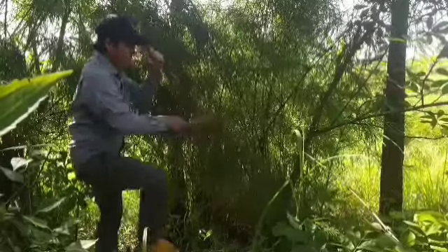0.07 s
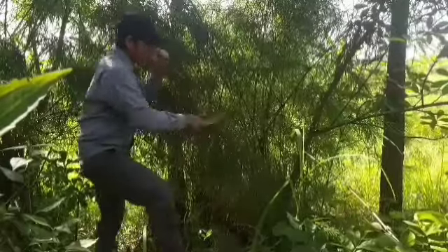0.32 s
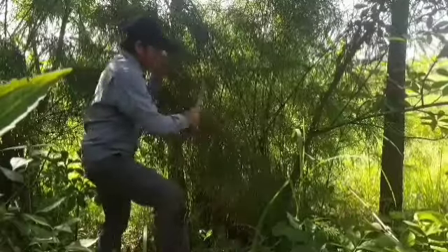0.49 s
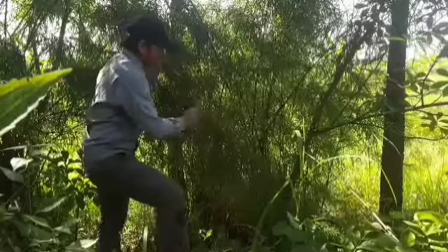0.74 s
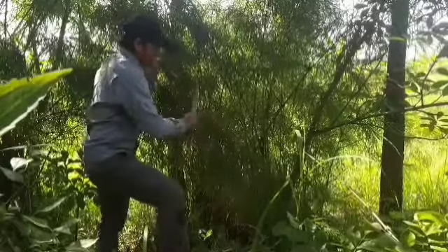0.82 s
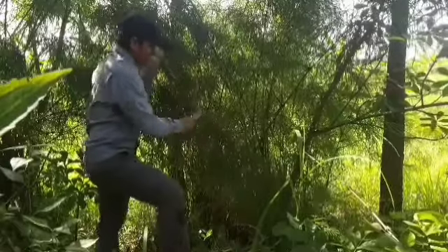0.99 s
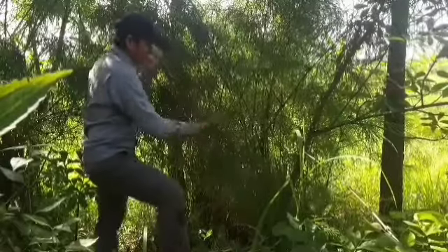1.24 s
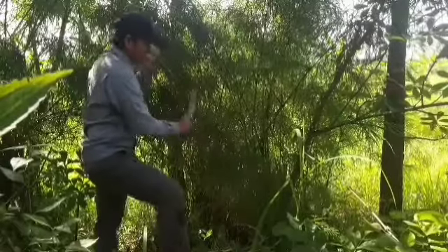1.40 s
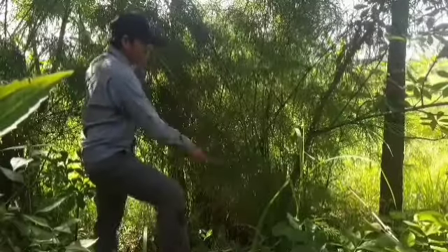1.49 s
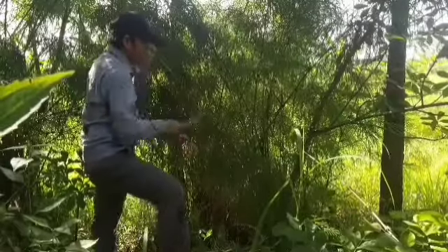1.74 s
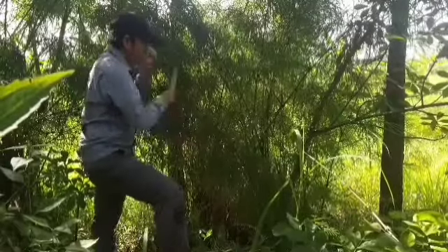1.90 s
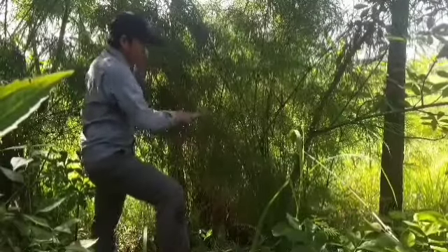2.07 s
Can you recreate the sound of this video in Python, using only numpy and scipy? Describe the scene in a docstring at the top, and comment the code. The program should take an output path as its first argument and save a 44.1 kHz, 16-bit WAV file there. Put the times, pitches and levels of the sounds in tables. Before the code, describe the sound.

A machete hacks thin woody stems in a thicket: three quick cracking strokes, a short gap, then three more, with bright blade ring and leaf rustle. Outdoors, mono, moderately close, soft forest echo and thin hiss.

```python
"""A long blade hacks at thin woody stems in a forest thicket: six strokes in 2.2 s.
A faint rustle comes first. Each stroke is a cluster of contacts: bursts of fibre snaps excite stem, blade and
splinter filters, while shaken leaves rustle as enveloped noise. Dull noise thuds lie under strokes 2, 3, 5 and 6;
the blade sings on after stroke 4 as a fuzzy sine. Decaying noise tails give the forest echo; a high hiss and
a low rumble, both filtered noise, run throughout."""
import sys
import numpy as np
from scipy import signal
from scipy.fft import rfft, irfft, next_fast_len
from scipy.io import wavfile
from scipy.ndimage import map_coordinates

SR = 44100
rng = np.random.default_rng(int(sys.argv[2]) if len(sys.argv) > 2 else 0)


def materialize(psi):
    """Save the field psi as 16-bit PCM at rate SR to the path in sys.argv[1].

    A 1-D psi becomes a single channel; in a 2-D psi each row is a channel.
    """
    bounded = np.clip(np.atleast_2d(psi).T, -1, 1)
    quanta = np.round(bounded * 32767).astype(np.int16)
    wavfile.write(sys.argv[1], SR, quanta)


N = 97020

# blade meets stem: (start [s], rise [s], decay [s], wood level [dB], blade ring level [dB], splinter level [dB],
# blade side modes [dB added], stem resonance [Hz], lowest wood frequency [Hz])
CONTACTS = [ (0.1721, 0.00035, 0.0039, -45.5, -43.5, -56, -11, 797, 447),
            (0.2040, 0.00058, 0.0032, -55, -54, -42, 2, 2290, 1100),
            (0.2083, .002, 0.0017, -42, -32.5, -46, -3.5, 2150, 1170),
            (0.319, 0.00045, 0.0055, -65, -77, -83, -2, 2100, 1000),
            (0.342, 0.0012, 0.0078, -65, -66, -71, 0, 3570, 1400),
            (0.4115, 0.00039, 0.0024, -47.5, -35, -35, 26, 2400, 1300),
            (0.4262, 0.0013, 0.0027, -50, -45, -56, -11, 2300, 1200),
            (0.4500, 0.0059, 0.0068, -30, -39, -39, 7, 1280, 1030),
            (0.4618, 0.0019, 0.009, -33, -33.5, -33, 4, 3670, 255),
            (0.4656, .0004, 0.00095, -35, -26.5, -36, 8, 4500, 295),
            (0.5055, 0.0017, 0.0024, -54.5, -67, -64, -8, 4700, 990),
            (0.7040, 0.00023, 0.0019, -51.5, -39, -58, -6.5, 4440, 1770),
            (0.7101, 0.00019, .003, -47.5, -49, -46.5, 0, 2180, 1360),
            (0.7366, 0.0012, 0.0055, -44, -32.5, -44, 0, 3770, 503),
            (0.7405, 0.00043, 0.00029, -36.5, -23.5, -30.5, 0.5, 1086, 298),
            (0.7420, 0.00035, 0.004, -35.5, -32, -50, -2, 1270, 250),
            (0.7610, 0.0004, .0015, -46.5, -55, -37.5, 11, 1500, 200),
            (0.8380, .001, 0.009, -57.5, -64, -62, -4, 4500, 800),
            (1.2248, 0.00026, 0.0036, -46.5, -36, -72, -16, 1820, 1330),
            (1.268, 0.0061, 0.0058, -46, -47, -43.5, 1, 2160, 1350),
            (1.317, 0.0013, 0.0055, -41.5, -35.5, -42, 8.5, 5180, 880),
            (1.4800, 0.00018, 0.00049, -43.5, -29, -42, 2.5, 2320, 600),
            (1.5328, 0.00098, 0.0049, -46.5, -41, -43, 9, 2820, 664),
            (1.5468, 0.00094, 0.009, -49.5, -49, -60, -12, 2180, 900),
            (1.5745, 0.0031, 0.0041, -45.5, -45, -62, -2, 2150, 717),
            (1.6440, 0.0047, 0.0058, -62, -46, -54, 13, 4900, 1500),
            (1.7040, 0.00026, 0.0013, -78, -63, -55.5, 12, 6140, 2000),
            (1.8573, 0.00023, 0.0047, -44.5, -33, -43, -7.5, 4570, 874),
            (1.879, 0.0009, 0.0064, -43.5, -36.5, -42, 3, 6240, 1100),
            (1.9020, 0.00017, 0.0028, -44.5, -49, -52, -3, 2210, 1300),
            (1.9197, .0005, 0.0037, -37, -30, -53, 2, 2930, 614),
            (1.9230, 0.0032, 0.0071, -44, -58, -41, -6, 870, 200),
            (1.9444, 0.0014, 0.0016, -48, -64, -43, 3, 2280, 404),
            (1.9900, 0.00066, .002, -68, -53.5, -52.5, 4, 4800, 1000), ]
# blade modes, main one first: (frequency [Hz], width [Hz], gain [dB])
BLADE_MODES = [(7980, 153, 3), (4850, 58, -11.5), (6224, 99, -11.5), (8340, 420, -8.5), (8680, 410, -8.5),
               (9730, 274, -6.5), (11770, 440, -24.5), (11870, 75, -11)]
# wood filter, for stems and twigs: (frequency [Hz], gain [dB])
WOOD_COLOUR = [(100, -28), (300, -8), (600, -7.5), (850, -4), (1050, -7), (1350, -1), (1800, -2),
               (2200, -0.5), (2550, -1), (3000, -0.5), (3700, -1.5), (4500, 1), (5400, -3.5), (6200, 2.5),
               (7100, -11), (10000, -30.5), (16000, -15.5)]
# splinter filter: (frequency [Hz], gain [dB])
SPLINTER_COLOUR = [(500, -51), (5000, -9.5), (7300, -21.5), (8100, 6.5), (9800, -4), (10600, 2.5),
                   (12500, 4.5), (14000, 2.5), (15000, 2), (16000, -36)]
# blade singing on after sliding off a stem: (start [s], frequency [Hz], level [dB], t60 [s])
BLADE_ZINGS = [(1.320, 10010, -40, .13)]
# clump shuddering under heavier blows: (start [s], rise [s], decay [s], level [dB])
CLUMP_THUDS = [(0.451, 0.025, 0.016, -54), (0.738, .012, 0.023, -58.5), (1.570, 0.014, 0.034, -62),
               (1.916, 0.03, 0.053, -61)]
# thud filter: (frequency [Hz], gain [dB])
THUD_COLOUR = [(60, -25), (110, -6), (160, 0.5), (250, 1.5), (340, -6.5), (480, -15), (900, -28),
               (3000, -58)]
# shaken foliage: (peak time [s], rise [s], decay [s], leaf drive [dB], twig drive [dB])
FOLIAGE_SHAKES = [ (0.010, 0.03, 0.038, -66, -70.5), (0.215, 0.025, 0.051, -49, -52.5),
                  (0.423, 0.0062, .04, -46.5, -45.5), (0.47, 0.0063, .022, -36, -46.5),
                  (0.722, 0.0081, 0.027, -50.5, -49), (0.749, .006, 0.026, -38, -43.5),
                  (1.105, 0.017, 0.031, -59.5, -91), (1.241, 0.0053, 0.011, -56, -54.5),
                  (1.293, 0.022, 0.038, -52.5, -53.5), (1.327, 0.0068, 0.028, -52, -58.5),
                  (1.49, 0.0067, 0.025, -69, -49), (1.606, 0.03, 0.021, -45.5, -48),
                  (1.938, 0.025, 0.017, -41, -42), (2.190, 0.034, 0.034, -72, -75), ]
# leaf filter: (frequency [Hz], gain [dB])
LEAF_COLOUR = [(300, -53), (2000, -12.5), (5000, -8), (7200, -7.5), (8050, 10.5), (9000, 2), (9900, 9),
               (10600, 3.5), (12500, 4.5), (15000, -0.5), (16000, 2)]
# forest echo decay: (frequency [Hz], t60 [s])
ECHO_T60 = [(200, .35), (1000, 0.37), (4000, 0.38), (9000, 0.42), (16000, 0.53)]
# forest echo filter: (frequency [Hz], gain [dB])
ECHO_COLOUR = [(200, -1), (1500, -18), (5000, -15.5), (8000, -14.5), (11000, -13.5), (16000, -11)]
# hiss filter: (frequency [Hz], gain [dB])
HISS_COLOUR = [(300, -11.5), (1000, -22), (2000, -24.5), (3800, -28), (5200, -17), (7100, -16.5),
               (8100, -4.5), (8650, 2), (9500, -10), (11500, -8.5), (13000, -15), (15500, -12)]
# hiss course: (time [s], level [dB])
HISS_LEVEL = [(0, -62.5), (.14, -63), (.3, -58), (.39, -67.5), (.6, -65.5), (.68, -67), (.9, -60),
              (.98, -67), (1.03, -61), (1.2, -64), (1.45, -66), (1.68, -60.5), (1.83, -66.5), (1.95, -56.5),
              (2.07, -64.5), (2.2, -61.5)]
# rumble filter: (frequency [Hz], gain [dB])
RUMBLE_COLOUR = [(20, -43), (38, -23), (54, 1), (75, -7), (98, -11), (122, -6.5), (160, -14), (210, -22),
                 (290, -21), (400, -40.5), (600, -55.5), (1500, -51.5)]
# rumble course: (time [s], level [dB])
RUMBLE_LEVEL = [(0.0, -58.5), (0.04, -57), (0.41, -56.5), (0.43, -55), (0.6, -55), (0.64, -72), (0.77, -52),
                (0.9, -50), (0.96, -64.5), (0.99, -59.5), (1.19, -55), (1.28, -60), (1.32, -53),
                (1.38, -59), (1.89, -60), (1.95, -57), (2.08, -60), (2.2, -55)]

LEVEL_WINDOW_S = 0.004  # contact levels: rms as if all energy fell in this window
SNAPS_PER_S, SNAP_SPREAD_DB = 16000, 0.5
STRIKE_DB = 13  # sharp strike at the peak of the burst, re rms of the snaps before their envelope
STEM_Q, STEM_RING_DB = 12.2, 7.5
BEND_RATIO, BEND_DB = 2.7, -1.5  # second bending mode of the stem
ECHO_RISE_S = 0.0036
TOP_HZ = 15500


def cracks():
    """Each contact: a burst of fibre snaps with a strike at its peak, sounding in stem, blade and splinters."""
    out = np.zeros(N + SR)
    t = np.arange(SR // 10) / SR
    window_gain = np.sqrt(LEVEL_WINDOW_S * SR / len(t))
    for start_s, rise_s, decay_s, wood_db, ring_db, splinter_db, side_db, own_hz, lowest_hz in CONTACTS:
        envelope = np.minimum(t / rise_s, 1) * np.exp(-np.maximum(t - rise_s, 0) / decay_s)
        fibres = envelope * snaps(len(t), SNAPS_PER_S, SNAP_SPREAD_DB)
        fibres[round(rise_s * SR)] += amp(STRIKE_DB)
        wood = filtered(coloured(fibres, WOOD_COLOUR), lambda hz: stem(hz, own_hz, lowest_hz))
        ring = filtered(fibres, lambda hz: blade(hz, side_db))
        splinters = coloured(fibres, SPLINTER_COLOUR)
        crack = amp(wood_db) * unit(wood)
        crack += amp(ring_db) * unit(ring)
        crack += amp(splinter_db) * unit(splinters)
        out[round(start_s * SR):][:len(t)] += crack * window_gain
    return out[:N]


def stem(hz, own_hz, lowest_hz):
    """Stem response: two bending modes; the thinner the stem, the less bass it radiates."""
    u = 1j * hz / lowest_hz
    high_pass = u ** 3 / ((1 + u) * (1 + u + u * u))  # third order
    modes = [(own_hz, STEM_RING_DB), (own_hz * BEND_RATIO, BEND_DB)]
    ringing = sum(amp(db) * resonance(hz, centre_hz, centre_hz / STEM_Q) for centre_hz, db in modes)
    return high_pass * (1 + ringing)


def blade(hz, side_db):
    """Blade response: the point of impact sets how strongly the side modes join the main one."""
    response = 0
    for k, (centre_hz, width_hz, db) in enumerate(BLADE_MODES):
        mode_db = db + side_db * (k > 0)
        response = response + (-1) ** k * amp(mode_db) * resonance(hz, centre_hz, width_hz)
    return response


def resonance(hz, centre_hz, width_hz):
    """Response of one damped mode."""
    return 1j * hz * width_hz / (centre_hz ** 2 - hz ** 2 + 1j * hz * width_hz)


def snaps(size, per_s, spread_db):
    """Tiny fibre or leaf snaps: random moments, signs and strengths, rms 1."""
    fires = rng.random(size) < per_s / SR
    strength = amp(spread_db * np.clip(rng.standard_normal(size), -2, 2))
    sign = np.sign(rng.standard_normal(size))
    return unit(fires * strength * sign)


def zings(knots_per_s=160, rise_s=0.002):
    """The freed blade holds one high decaying tone; random phase makes it slightly fuzzy."""
    out = np.zeros(N + SR)
    t = np.arange(N) / SR
    for start_s, hz, db, t60_s in BLADE_ZINGS:
        envelope = amp(db - 60 * t / t60_s) * np.minimum(t / rise_s, 1)
        tone = envelope * np.sin(2 * np.pi * hz * t + wobble(knots_per_s))
        out[round(start_s * SR):][:SR // 2] += tone[:SR // 2]
    return out[:N]


def thuds():
    """The clump of stems shudders: low noise with a soft onset and exponential decay."""
    t = np.arange(N) / SR
    shudder = np.zeros(N)
    for start_s, rise_s, decay_s, db in CLUMP_THUDS:
        rise = np.clip((t - start_s) / rise_s, 0, 1)
        decay = np.exp(-np.maximum(t - start_s - rise_s, 0) / decay_s)
        shudder += amp(db) * rise * decay
    return shudder * unit(coloured(rng.standard_normal(N), THUD_COLOUR))


def foliage():
    """Leaves and twigs brush each other as the stem jerks, then settle."""
    t = np.arange(N) / SR
    leaves, twigs = np.zeros(N), np.zeros(N)
    for peak_s, rise_s, decay_s, leaves_db, twigs_db in FOLIAGE_SHAKES:
        shake = np.exp(-np.maximum((peak_s - t) / rise_s, (t - peak_s) / decay_s))
        leaves += amp(leaves_db) * shake
        twigs += amp(twigs_db) * shake
    brushing = snaps(N, per_s=12000, spread_db=3)
    crackling = snaps(N, per_s=6000, spread_db=5)
    return coloured(leaves * brushing, LEAF_COLOUR) + coloured(twigs * crackling, WOOD_COLOUR)


def forest(x):
    """Trunks and crowns scatter a diffuse tail, redrawn for every quarter second of sound."""
    out = np.zeros(N + 2 * SR)
    step = SR // 4
    for start in range(0, N, step):
        hz, t, bins = signal.stft(rng.standard_normal(SR // 2), SR, nperseg=256)
        fade = amp(-60 * t / along(ECHO_T60, hz)[:, None])
        rise = 1 - np.exp(-t / ECHO_RISE_S)
        tail = signal.istft(bins * fade * rise, SR)[1]
        echo = signal.fftconvolve(x[start:start + step], tail / np.linalg.norm(tail))
        out[start:][:len(echo)] += echo
    return coloured(out[:N], ECHO_COLOUR)


def background(flutter_db=0.54):
    """A thin fluttering hiss, like far insects, over an uneven low rumble; both shaped noise."""
    hiss = unit(coloured(rng.standard_normal(N), HISS_COLOUR))
    rumble = unit(coloured(rng.standard_normal(N), RUMBLE_COLOUR))
    hiss_db = curve(HISS_LEVEL) + flutter_db * wobble(45)
    return hiss * amp(hiss_db) + rumble * amp(curve(RUMBLE_LEVEL))


def wobble(knots_per_s):
    """Smooth random curve from normal-distributed knots."""
    knots = rng.standard_normal(int(N * knots_per_s / SR) + 4)
    return map_coordinates(knots, [np.arange(N) * knots_per_s / SR])


def amp(db):
    """Decibels to gain."""
    return 10 ** (np.asarray(db) / 20)


def unit(x):
    """Scale to rms 1."""
    return x / np.sqrt(np.mean(x ** 2) + 1e-20)


def along(points, hz):
    """Interpolate (frequency [Hz], value) points on a log frequency axis."""
    point_hz, values = np.transpose(points)
    return np.interp(np.log(hz + 1), np.log(point_hz + 1), values)


def curve(points):
    """Interpolate (time [s], value) points, one value per sample."""
    return np.interp(np.arange(N) / SR, *np.transpose(points))


def filtered(x, response):
    """Apply a complex frequency response, zero-padded."""
    size = 2 * next_fast_len(len(x))
    spectrum = rfft(x, size) * response(np.fft.rfftfreq(size, 1 / SR))
    return irfft(spectrum, size)[:len(x)]


def coloured(x, points):
    """Causal minimum-phase filter of the given (frequency [Hz], gain [dB]) shape."""
    def response(hz):
        cepstrum = irfft(np.log(amp(along(points, hz))))
        half = len(cepstrum) // 2
        cepstrum[1:half] *= 2  # fold onto positive time
        cepstrum[half + 1:] = 0
        return np.exp(rfft(cepstrum))
    return filtered(x, response)


def scene():
    """Cutting, its forest echo and the background."""
    cutting = cracks() + zings() + thuds() + foliage()
    return (cutting + forest(cutting) + background())[None]


def record(dry):
    """The recorder's band limit: 0.1 dB lost per Hz above TOP_HZ."""
    band_limit = lambda hz: amp(-np.maximum(hz - TOP_HZ, 0) / 10)
    return np.array([filtered(channel, band_limit) for channel in dry])


dry = scene()
out = record(dry)
materialize(out)
```